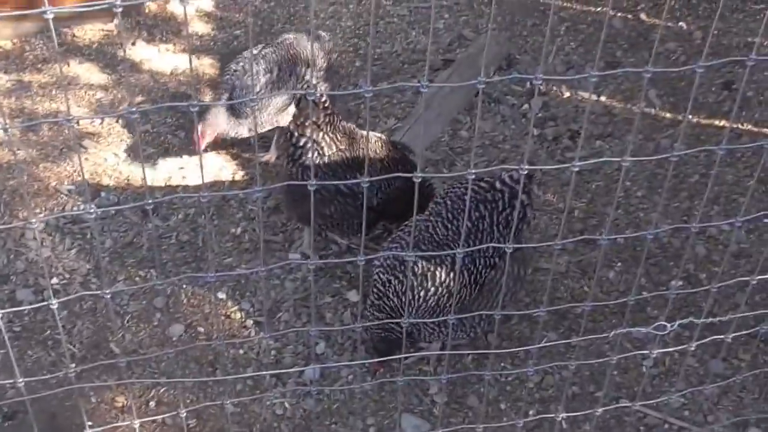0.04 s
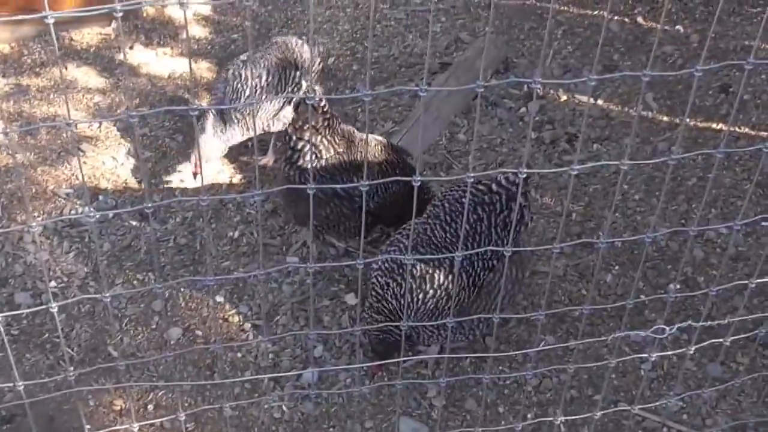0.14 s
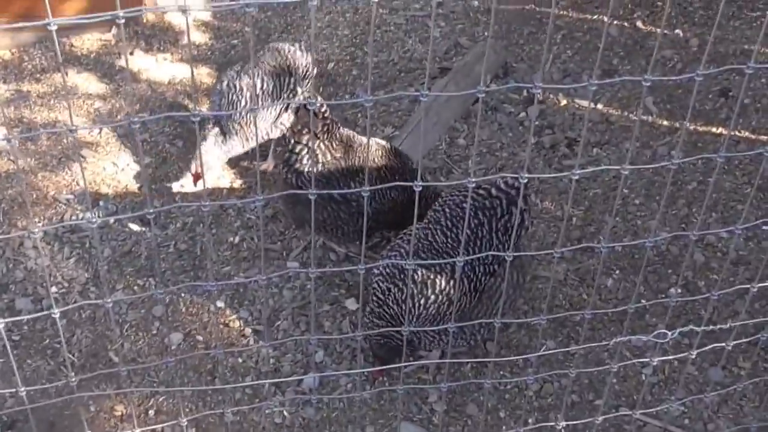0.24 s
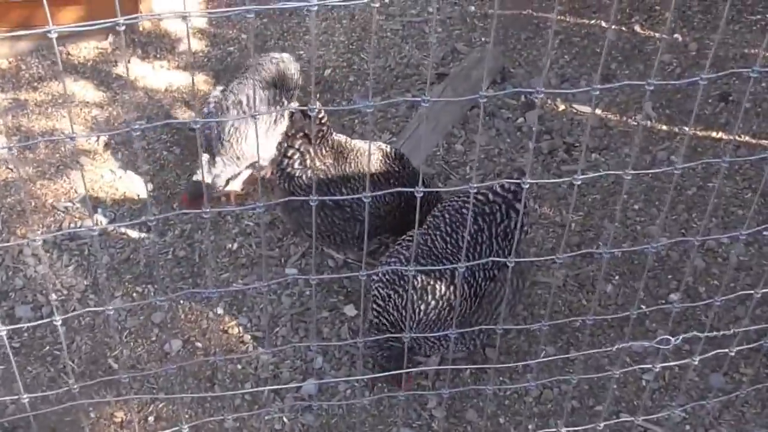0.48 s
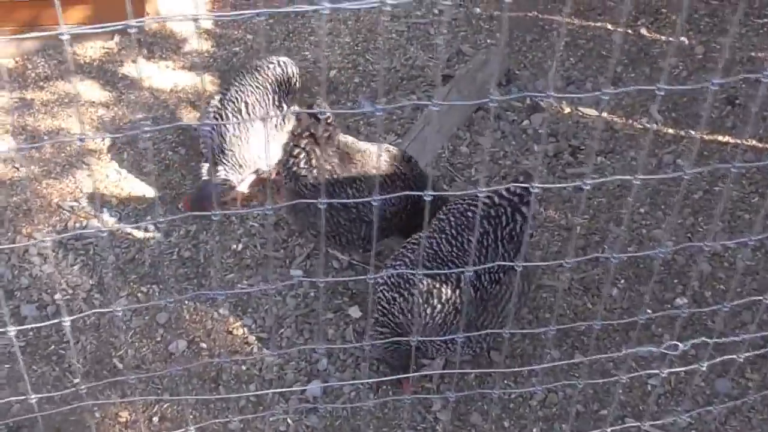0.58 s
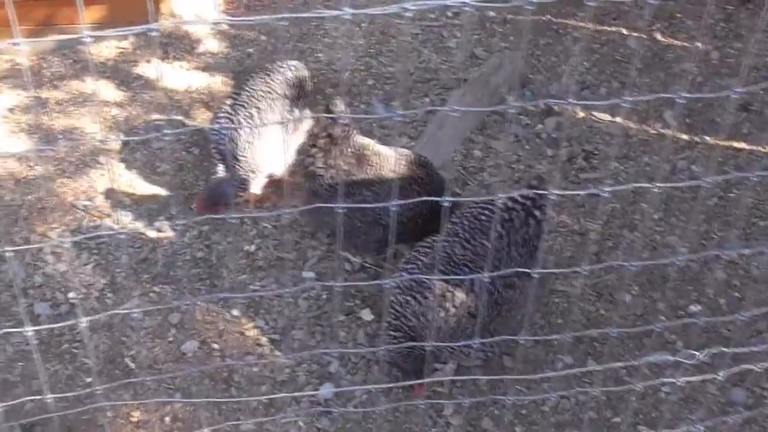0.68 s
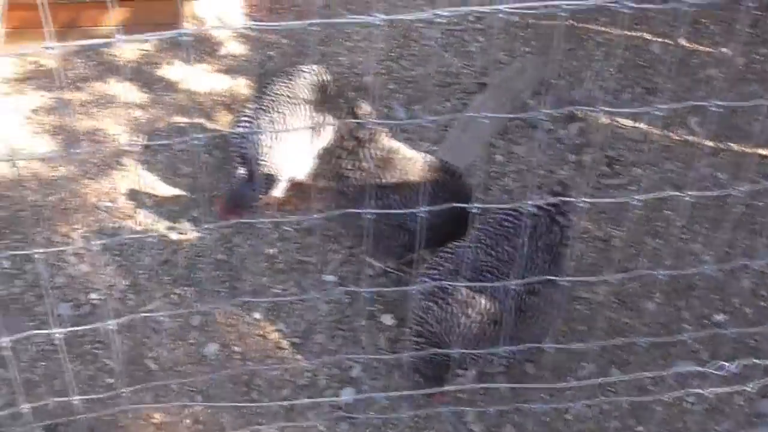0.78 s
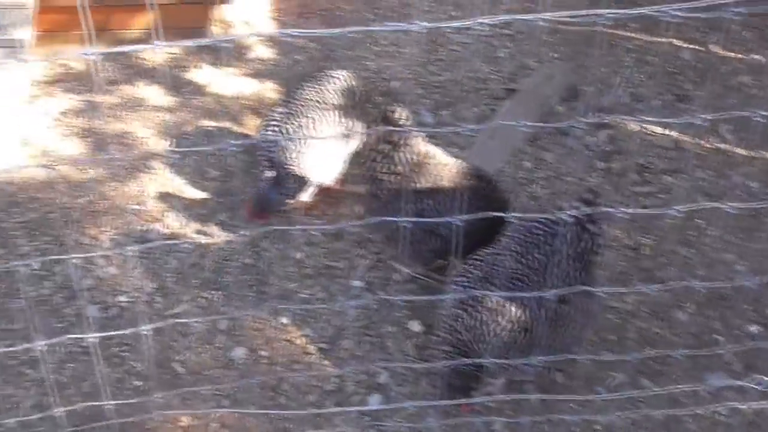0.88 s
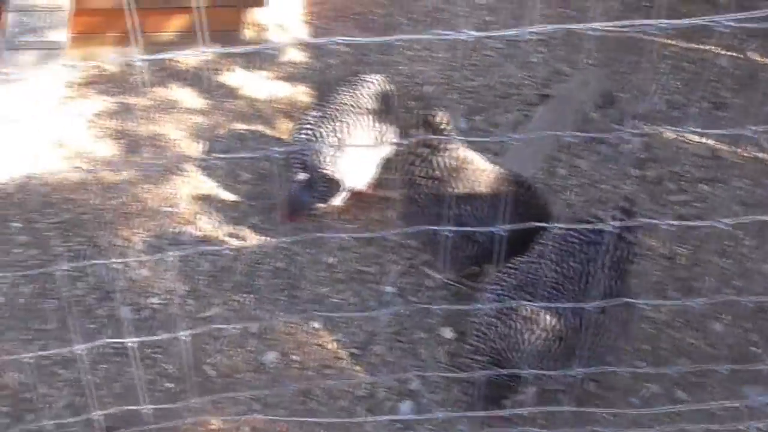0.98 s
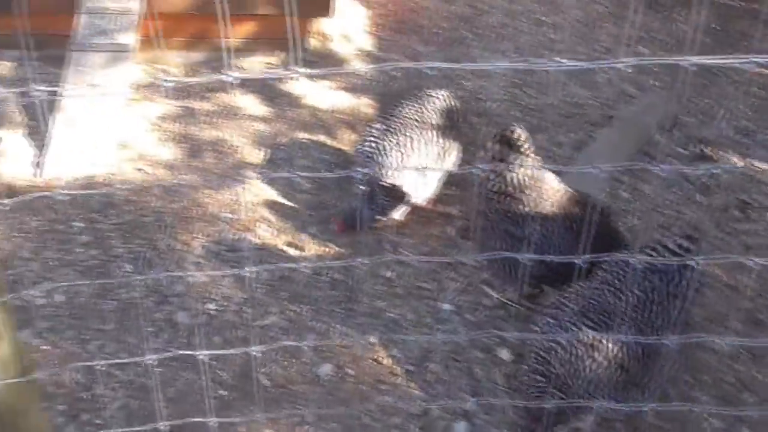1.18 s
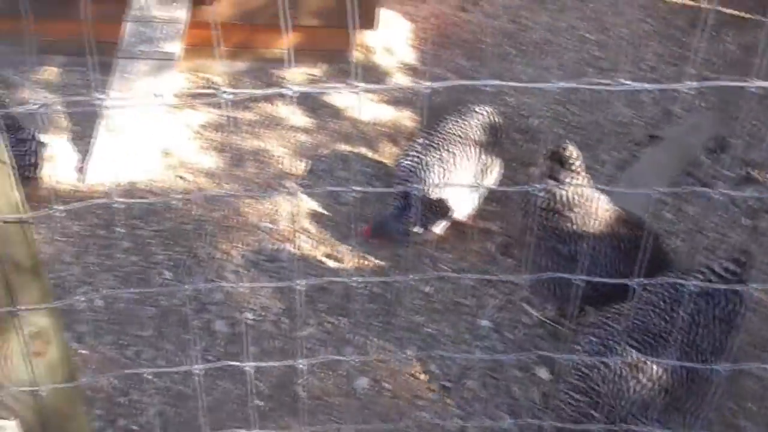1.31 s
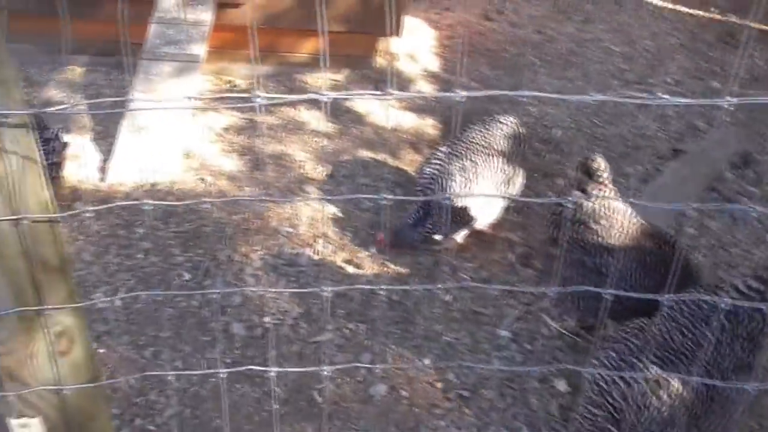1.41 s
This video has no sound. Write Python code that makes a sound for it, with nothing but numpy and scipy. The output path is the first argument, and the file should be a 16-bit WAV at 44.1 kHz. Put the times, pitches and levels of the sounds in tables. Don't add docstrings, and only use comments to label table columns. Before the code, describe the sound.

Close, rough hen squawks, one early and one later, slap briefly off nearby walls in an outdoor pen; claws and beaks tick faintly on stones while a distant motor hums steadily beneath light microphone hiss.

```python
import sys
import numpy as np
from scipy import signal
from scipy.fft import rfft, irfft
from scipy.io import wavfile
from scipy.ndimage import uniform_filter1d

SR = 44100
rng = np.random.default_rng(int(sys.argv[2]) if len(sys.argv) > 2 else 0)


def volts_from_decibels(level):
    exponent = np.asarray(level, float) / 20
    return 10 ** exponent


def unload_audio(sound):
    columns = np.transpose(np.atleast_2d(sound))
    steps = np.round(np.clip(columns, -1, 1) * 32767)
    wavfile.write(sys.argv[1], SR, steps.astype(np.int16))


N = 63945

# (time [s], effort [dB], neck resonance [Hz], pulse rate [1/s])
SQUAWKS = [
    [(.1868, -49, 1184, 64), (.203, -32.5, 1246, 55.6), (.228, -31, 1129, 49.5), (.25, -25.5, 1147, 54.4),
     (.28, -26, 1164, 51), (.3, -23, 1171, 52.5), (.322, -24.5, 1203, 55), (.336, -30.5, 1163, 57.7),
     (.366, -32, 1115, 55.33)],
    [(.8918, -48, 1194, 60), (.909, -30.5, 1213, 59.9), (.938, -27, 1111, 52.5), (.965, -26.5, 1147, 56.5),
     (1.0, -28.5, 1200, 55.5), (1.02, -24.5, 1118, 51.5), (1.045, -25, 1116, 54), (1.066, -27.5, 1099, 54)],
]
# (centre [Hz], width [Hz], level [dB])
WINDPIPE = [
    [(399, 23, -13.5), (532, 39, -9), (680, 42, -28), (791, 33, -15), (920.7, 50, -20), (1035, 53, -2),
     (1403, 53, -14.5), (1556, 81, -30)],
    [(394, 18.4, -15), (514.4, 36, -15.5), (681.6, 21, -25), (785, 18.6, -25.5), (898, 50, -19.5),
     (1026.6, 35.6, 0.5), (1429, 39, -13), (1515, 41, -36)],
]
# (width [Hz], level [dB])
NECK = [(50, 3), (55, -4.5)]
# (centre [Hz], width [Hz], level [dB])
BEAK = [
    [(1780, 470, 1.5), (2980, 254, 9), (3590, 270, 4.5), (4240, 610, 4), (6400, 1500, -11.5),
     (7900, 250, -3.5), (10000, 3160, -21.5)],
    [(1760, 440, -1), (2876, 200, 6.5), (3690, 470, 0.5), (5000, 420, -1.5), (6190, 400, -9.5),
     (7520, 397, -10.5), (10000, 3000, -28.5)],
]
# (time [s], length [s], level [dB], centre [Hz])
SCRATCHES = [(0.385, .04, -67, 10000), (0.733, 0.034, -61.5, 10000), (.765, 0.037, -66, 10500),
             (0.825, 0.067, -74, 11170), (0.965, 0.0092, -56, 9500), (0.982, 0.038, -62.5, 10000),
             (1.07, 0.038, -64.5, 7200), (0.337, 0.043, -63.5, 7800), (1.153, 0.069, -69.5, 5670),
             (1.229, 0.015, -63.5, 4540), (1.232, 0.019, -63.5, 9100), (1.285, 0.014, -70, 6700)]
# (time [s], level [dB], centre [Hz])
TICKS = [(.4, -63.5, 10000), (.427, -69, 12400), (.474, -56.5, 10000), (.484, -63.5, 4800),
         (.533, -74, 10900), (.646, -53, 11400), (.646, -65, 4100), (.67, -56, 12500), (.67, -64, 7500),
         (.766, -68, 12330), (.787, -54.5, 8930), (.787, -64, 15000), (.845, -66, 10000), (1.18, -61, 4660),
         (1.198, -62.5, 5000), (1.208, -69, 6200), (1.296, -69, 7600), (1.36, -66, 5000)]
# (frequency [Hz], width [Hz], level [dB])
HUM = [(117.1, 3.6, -57), (203.3, 20, -55), (240.35, 2.83, -43), (265.3, 4.6, -53)]
# (frequency [Hz], density [dB per Hz])
RUMBLE = [(15, -55), (25, -24.5), (114, -5), (189, -0.5), (261, -4), (353, -7), (928, -19), (1130, -20),
          (1800, -40), (2340, -79), (3960, -120)]
# (frequency [Hz], density [dB per Hz])
HISS = [(880, -18), (1500, -14), (1920, -8), (2650, -10), (3040, -8), (5680, -13), (9100, -2.5),
        (15600, -11)]
# (frequency [Hz], coherence [-1..1])
COHERENCE = [(60, 1), (130, 0.95), (290, 0.75), (640, 0.61), (1410, 0.32), (3100, 0.16), (6820, 0.63),
             (15000, 1)]
# (frequency [Hz], lead [rad])
BACKGROUND_LEAD = [(0, 1), (520, -0.6), (2240, 1), (2670, 0.0), (15300, 0.3)]
# (frequency [Hz], level [dB])
BACKGROUND_TILT = [(60, 1), (240, -0.5), (950, -2), (3770, -1), (15000, 0.0)]
# (frequency [Hz], lead [rad])
HEN_LEAD = [(0, 0), (3270, 0.31), (3620, 0.67), (5770, 0.2), (15300, -0.1)]

BEAK_DB, BEAK_FADE_DB = [-25.5, -24], [-15.5, -36]
BEAK_WIDEST = [0.21, 0.4]
BEAK_UNEVEN_DB = [-0.4, 3.]
CHEST_DB = [-13, -12.5]
PAN_DB = [1.5, 0.67]

SECOND_SNAP_S, SECOND_SNAP_DB = 0.0051, -3.5
THIRD_SNAP_S, THIRD_SNAP_DB = 0.0115, -5
PUFF_CYCLES, RELEASE_S, UNEVEN_DB = 0.4, 0.008, 1.47
ROUGH_START, ROUGH_END = 0.08, 0.22
AIRY_START, AIRY_END = 0.5, 0.93
CHEST_ROUGH, CHEST_GLIDE, DARKEN_DB = 0.35, 0.73, -10

GRAINS_PER_S, TICK_S = 1300, 0.00257
SLAP_T60_S, SLAP_DB = 0.13, -3.5
YARD_T60_S, YARD_DB = 1.38, -21
HUM_CLEAN = 0.86
RUMBLE_DB, HISS_DB = -48, -68.5


def evened(x):
    return x / np.sqrt(np.mean(x ** 2) + 1e-20)


def read(points, hz):
    f, value = np.transpose(points)
    return np.interp(np.log(hz + 1), np.log(f + 1), value)


def add(mix, start_s, sound):
    part = mix[..., round(start_s * SR):][..., :sound.shape[-1]]
    part += sound[..., :part.shape[-1]]


def resonate(x, hz, width_hz):
    turn = np.exp(2j * np.pi * np.cumsum(hz * np.ones(len(x))) / SR)
    r = np.exp(-np.pi * width_hz / SR)
    return 2 * (turn * signal.lfilter([1 - r], [1, -r], x / turn + 1e-18)).real


def ring(x, modes):
    out = np.zeros(len(x))
    for j, (hz, width_hz, db) in enumerate(modes):
        out += (-1) ** j * volts_from_decibels(db) * resonate(resonate(x, hz, width_hz), hz, 5 * width_hz)
    return out


def ports(x, lead):
    half = .5j * read(lead, np.fft.rfftfreq(N, 1 / SR))
    return irfft(rfft(x) * np.exp([half, -half]), N)


def squawk(k):
    s, effort_db, neck_points_hz, rate = np.transpose(SQUAWKS[k])
    t = s[0] + np.arange(round(.3 * SR)) / SR
    along = np.clip((t - s[0]) / (s[-1] - s[0]), 0, 1)
    turns = np.cumsum(np.interp(t, s, rate)) / SR
    cycle = turns.astype(int)

    first = np.diff(cycle, prepend=-1)
    second = volts_from_decibels(SECOND_SNAP_DB) * np.roll(first, round(SECOND_SNAP_S * SR))
    third = volts_from_decibels(THIRD_SNAP_DB) * np.minimum(5 * along, 1) * np.roll(first, round(THIRD_SNAP_S * SR))
    snaps = evened(first + second + third)
    noise = rng.standard_normal((2, len(t)))
    puffs = (np.exp(-(turns % 1) / PUFF_CYCLES) + 0.67 * along ** 2) * noise
    pipe_puffs, beak_puffs = evened(puffs[0]), evened(puffs[1])

    chance = rng.standard_normal(40)
    cycle_db = np.interp(t[first > 0], s, effort_db)[cycle] + UNEVEN_DB * chance[cycle]
    effort = volts_from_decibels(cycle_db) * np.exp(-np.maximum(t - s[-1], 0) / RELEASE_S)

    rough = ROUGH_START + (ROUGH_END - ROUGH_START) * along
    airy = AIRY_START + (AIRY_END - AIRY_START) * along
    drive = (1 - rough) * snaps + rough * pipe_puffs
    chest = evened(first) + CHEST_ROUGH * rough * pipe_puffs
    rasp = (1 - airy) * snaps + airy * beak_puffs
    gape_db = BEAK_FADE_DB[k] * (along - BEAK_WIDEST[k]) ** 2
    rasp = rasp * volts_from_decibels(gape_db + BEAK_UNEVEN_DB[k] * (-1) ** cycle * (along < .65))

    neck_hz = np.interp(t, s, neck_points_hz)
    glide = (neck_hz / neck_points_hz.mean()) ** CHEST_GLIDE
    chest_modes = [(hz * glide, width, db) for hz, width, db in WINDPIPE[k][:5]]
    top = [(hz, width, db + 5 + DARKEN_DB * along) for hz, width, db in WINDPIPE[k][6:]]
    pipe_modes = [WINDPIPE[k][5], *top, (neck_hz, *NECK[k])]

    def voiced(x, modes):
        return ring(x * effort, modes) / np.std(ring(x, modes))

    call = voiced(drive, pipe_modes)
    call = call + volts_from_decibels(CHEST_DB[k]) * voiced(chest, chest_modes)
    call = call + volts_from_decibels(BEAK_DB[k]) * voiced(rasp, BEAK[k])
    return s[0], call


def walls(x, t60_s, start_s, dull_hz):
    t = np.arange(SR) / SR
    shared = rng.choice([-1., 1.], SR) * (rng.random(SR) < .04)
    own = rng.choice([-1., 1.], (2, SR)) * (rng.random((2, SR)) < .04)
    taps = (shared + 0.9 * own) * volts_from_decibels(-60 * t / t60_s) * (t > start_s)
    taps = taps / np.linalg.norm(taps[0])
    taps = signal.lfilter(*signal.butter(1, dull_hz, fs=SR), taps)
    return signal.fftconvolve(x[None], taps, axes=1)[:, :N]


def gravel():
    out = np.zeros(N)
    t = np.arange(4000) / SR
    for start_s, length_s, db, hz in SCRATCHES:
        chance, size, sign = rng.random((3, 4000))
        hits = (chance < GRAINS_PER_S / SR) * volts_from_decibels(-4 * np.log(size + 1e-3)) * np.sign(sign - .5)
        grains = hits + 1.5 * (sign - .5)
        shape = np.minimum(t / .001, 1) * np.exp(-np.maximum(t - length_s, 0) / 0.0016)
        bright = evened(resonate(resonate(grains, hz, .5 * hz), hz, 0.76 * hz))
        add(out, start_s, volts_from_decibels(db) * shape * bright)
    t = np.arange(400) / SR
    for start_s, db, hz in TICKS:
        click = evened(resonate(rng.standard_normal(400), hz, .4 * hz))
        add(out, start_s, volts_from_decibels(db) * np.exp(-t / TICK_S) * click)
    return out * volts_from_decibels([[1.], [-1.]])


def hum():
    t, out = np.arange(N) / SR, np.zeros(N)
    for hz, width_hz, db in HUM:
        steady = np.sqrt(2) * np.sin(2 * np.pi * (hz * t + rng.random()))
        fuzz = evened(resonate(rng.standard_normal(2 * N), hz, width_hz)[N:])
        out += volts_from_decibels(db) * (HUM_CLEAN * steady + np.sqrt(1 - HUM_CLEAN ** 2) * fuzz)
    return ports(out, BACKGROUND_LEAD)


def air():
    frames, hz = N // 256 + 5, np.fft.rfftfreq(1024, 1 / SR)
    a, b, c, d, patches = rng.standard_normal((frames, 513, 5)).T
    patches = uniform_filter1d(patches, size=10, axis=0)
    patches = evened(uniform_filter1d(patches, size=12, axis=1))
    same = read(COHERENCE, hz)[:, None]
    left = a + 1j * b
    right = same * left + np.sqrt(1 - same ** 2) * (c + 1j * d)
    turn = np.exp(-1j * read(BACKGROUND_LEAD, hz)) / volts_from_decibels(read(BACKGROUND_TILT, hz))
    z = np.array([left, right * turn[:, None]]) * volts_from_decibels(0.97 * patches)

    def coloured(spectrum):
        shaped = z * volts_from_decibels(read(spectrum, hz))[:, None]
        return evened(signal.istft(shaped, nperseg=1024, noverlap=768)[1][:, :N])

    return volts_from_decibels(RUMBLE_DB) * coloured(RUMBLE) + volts_from_decibels(HISS_DB) * coloured(HISS)


def scene():
    hen, side_db = np.zeros(N), np.zeros(N)
    for k in range(len(SQUAWKS)):
        start_s, call = squawk(k)
        add(hen, start_s, call)
        side_db[round(start_s * SR):] = PAN_DB[k] / 2
    direct = ports(hen, HEN_LEAD) * volts_from_decibels([side_db, -side_db])
    slap = volts_from_decibels(SLAP_DB) * walls(hen, SLAP_T60_S, 0.0066, 2100)
    yard = volts_from_decibels(YARD_DB) * walls(hen, YARD_T60_S, 0.017, 1400)
    return direct + slap + yard + gravel() + hum() + air()


def roll_off(x):
    return signal.sosfilt(signal.butter(12, 15740, fs=SR, output="sos"), x)


def record(dry):
    edge = signal.firwin(511, 15780, window=("kaiser", 9), fs=SR)
    mix = signal.oaconvolve(dry, edge[None], "same")
    return roll_off(mix)


dry = scene()
out = record(dry)
unload_audio(out)
```